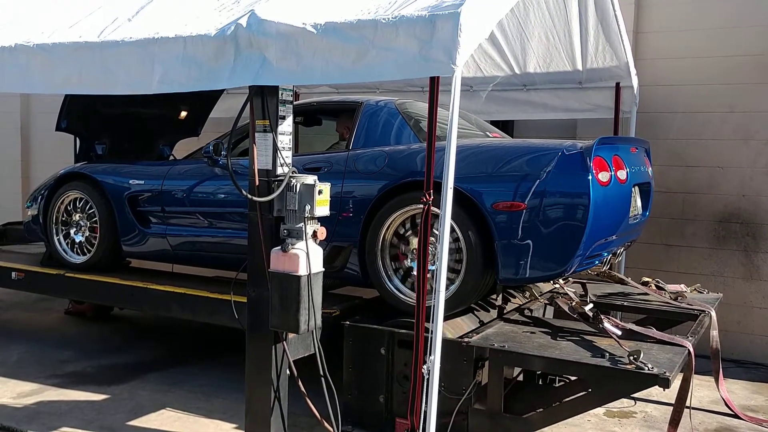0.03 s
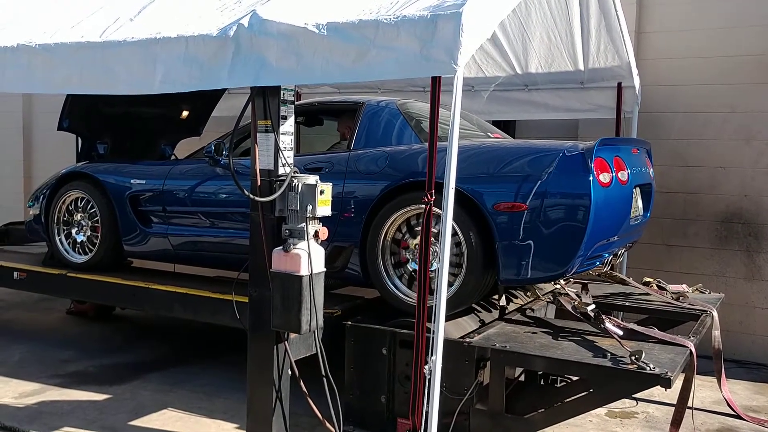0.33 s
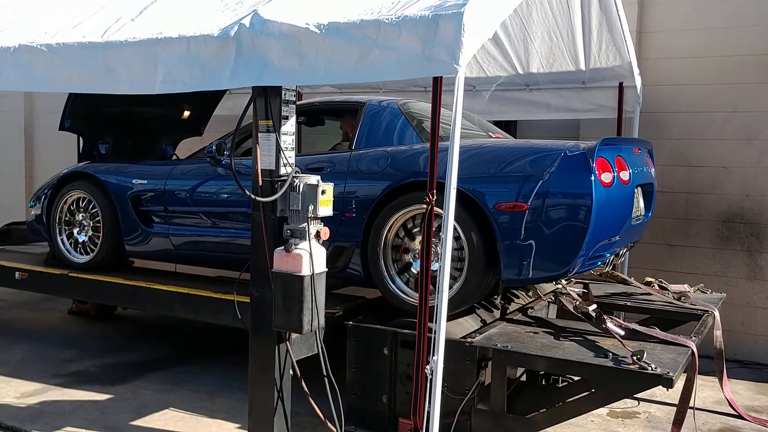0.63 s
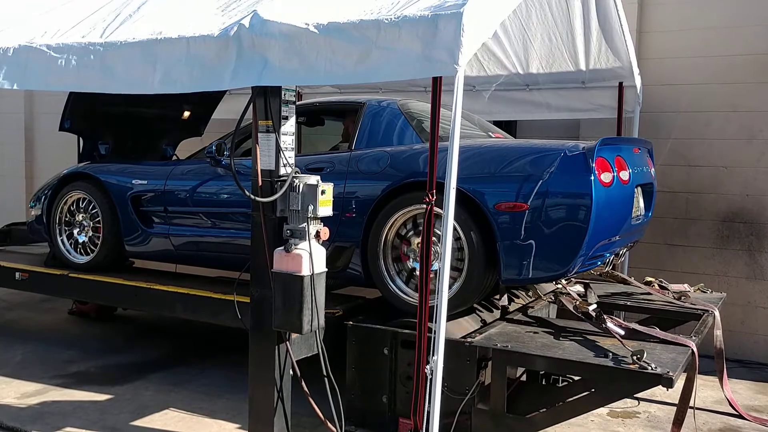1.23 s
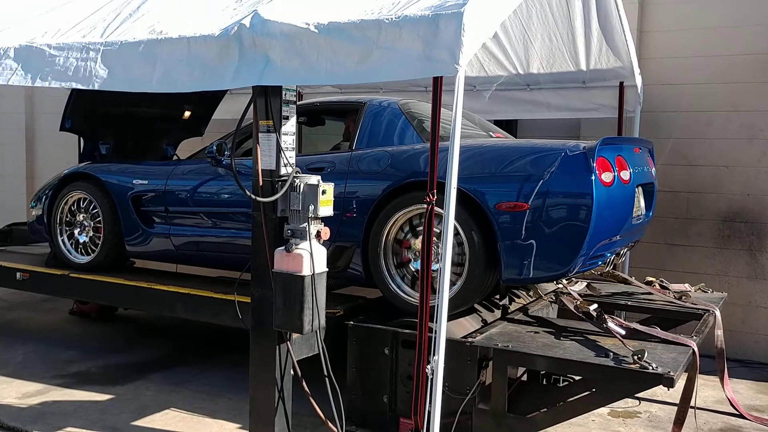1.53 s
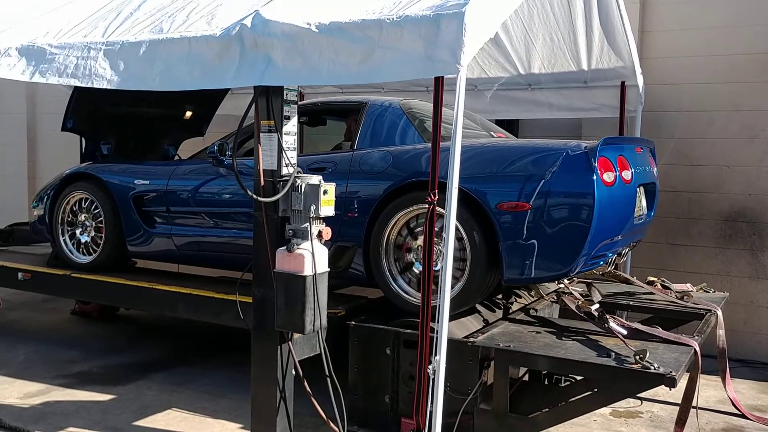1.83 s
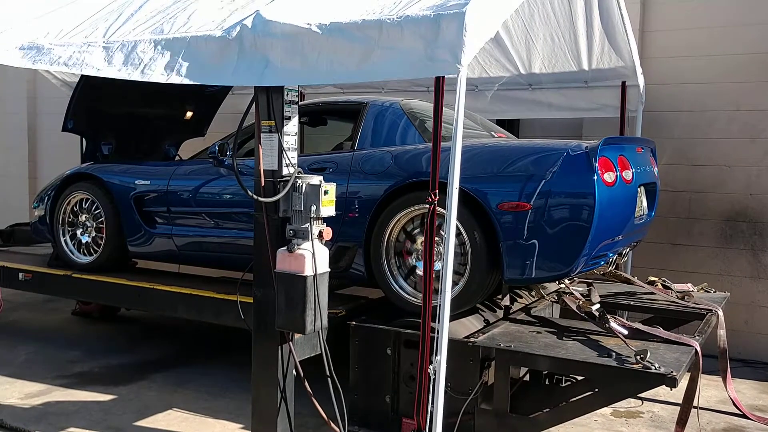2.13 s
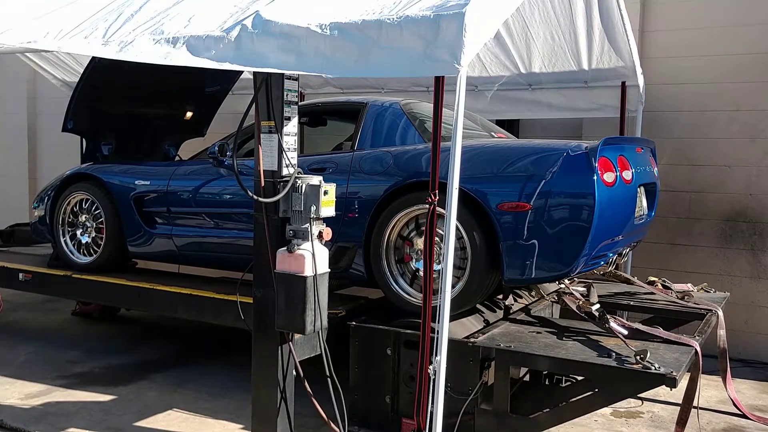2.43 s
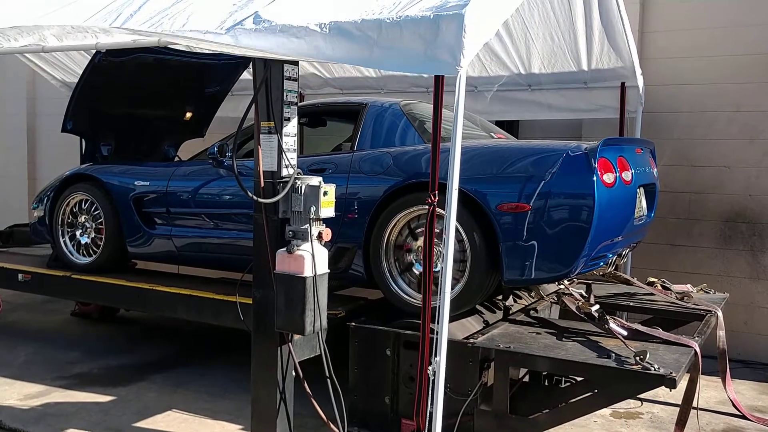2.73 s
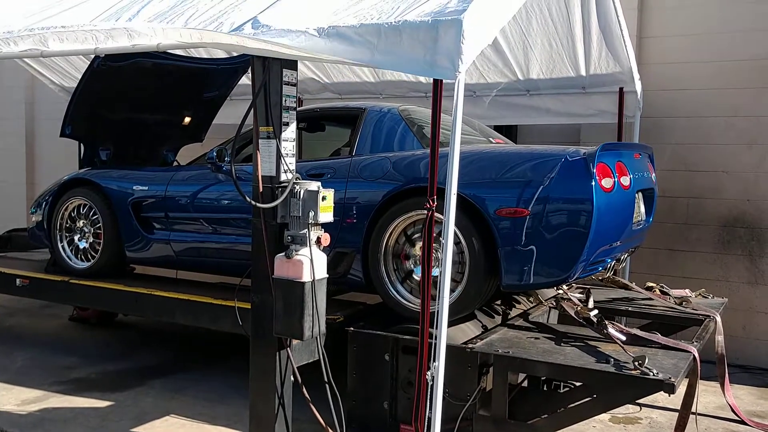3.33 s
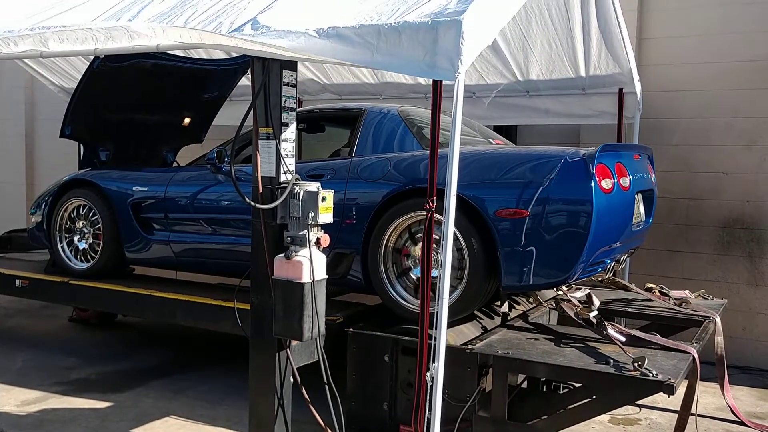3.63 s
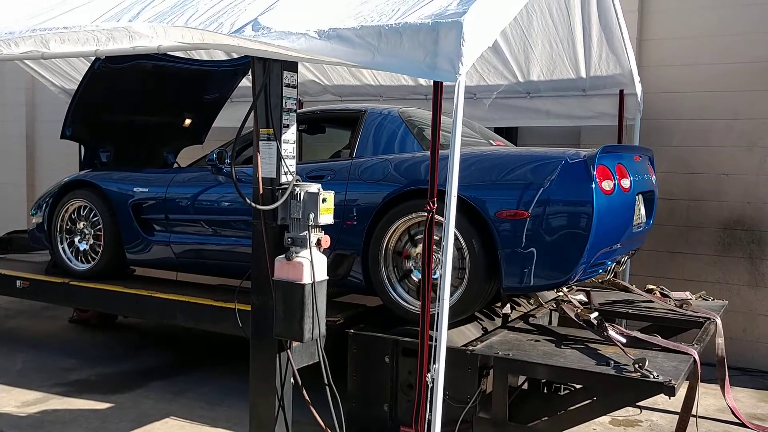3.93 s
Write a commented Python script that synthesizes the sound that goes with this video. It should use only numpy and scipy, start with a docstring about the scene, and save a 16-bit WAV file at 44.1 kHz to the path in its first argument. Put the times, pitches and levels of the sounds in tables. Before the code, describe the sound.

A sports car's V8 roars under load in a yard, starting with a thump and a fading suck of air, then revving smoothly higher. The exhaust is straight ahead, fan hiss slightly left, with short echoes off a nearby wall.

```python
"""A V8 barks as the throttle opens, then pulls steadily up through its revs: a sports car strapped to
a rolling road under an awning. The exhaust sits dead centre between the microphones, the orders of its
uneven beat sweeping through the fixed resonances of pipes and yard over a rasp of turbulent gas.
At the start the drive line thumps, and a suck and thin whistle fade as the throttle opens.
Fan and intake hiss off to the left; short echoes come back from the nearby wall and ramp."""
import sys
import numpy as np
from scipy import signal
from scipy.fft import rfft, irfft, next_fast_len
from scipy.io import wavfile

SR = 44100
rng = np.random.default_rng(int(sys.argv[2]) if len(sys.argv) > 2 else 0)


def transcribe(signal):
    """Save signal, clipped to [-1, 1], as a 16-bit WAV file at the path in sys.argv[1]."""
    frames = np.atleast_2d(signal).T
    limited = np.clip(frames, -1, 1)
    pcm = np.round(limited * 32767).astype(np.int16)
    wavfile.write(sys.argv[1], SR, pcm)


N = 176400
TIME = np.arange(N) / SR

# engine speed, eight firings a cycle (time [s], cycle rate [Hz])
ENGINE_SPEED = [(0, 21.77), (0.12, 21.85), (0.28, 22.78), (0.42, 22.86), (0.87, 24.56), (1.5, 26.94),
                (2.1, 29.24), (3, 32.81), (3.5, 34.84), (4, 36.89)]
# how hard the engine works (time [s], note level [dB], rasp level [dB], unevenness [0 = even])
ENGINE_EFFORT = [(0, -0.5, 7.5, 0.9), (.11, 0.5, 5.5, 1.2), (.18, 3.5, 12, 1.04), (.3, 4, 2, 1),
                 (.42, 1.5, 0.5, 0.8), (.66, 4.5, 7, 0.91), (.75, 1, 4.5, 0.83), (.9, 4.5, 4, 0.73),
                 (1.3, -1, 3.5, 0.27), (2, 0.36, 2, 0.01), (2.55, 1.5, 9.5, 0.28), (2.75, 2, 2, 0.19),
                 (3.1, 3.5, 9, 0.22), (3.7, 5, 8, 0.18), (4, 1.5, 8.5, 0.08)]
# cylinders in firing order (bank [0 or 1], place [count from the front])
FIRING_ORDER = [(0, 0), (1, 3), (0, 3), (1, 0), (1, 2), (0, 2), (1, 1), (0, 1)]
# harmonics of the exhaust beat (order [multiple of the cycle rate], level [dB])
EXHAUST_ORDERS = [(3, -3.9), (4, -14.9), (5, -3.1), (6, -11.1), (7, -9.5), (8, 4.4), (9, -19.6),
                  (10, -12.2), (11, -12.3), (12, -16.9), (13, -12.3), (14, -4.5), (15, -11.3), (16, 7.3),
                  (17, -8.7), (18, -1.4), (19, 2.8), (20, 0.9), (21, -1.9), (22, 9.7), (23, -5.7),
                  (24, 13.1), (25, -0.5), (26, 5.4), (27, 8.1), (28, 3.5), (29, 4.8), (30, 10.0),
                  (31, -0.6), (32, 13.9), (33, 4.9), (34, 9.0), (35, 9.5), (36, 7.2), (37, 2.0), (38, 9.9),
                  (39, 0.9), (40, 8.3)]
# orders that flare or sink, the opening bark first (time [s], order [multiple], half length [s], gain [dB])
ORDER_FLARES = [(.11, 38, .08, -15), (.12, 34, .09, -15), (.15, 8, .12, -8), (.2, 24, .11, 10),
                (.23, 32, .11, 9), (.36, 33, .22, 7.5), (.44, 17, .19, -13), (.6, 32, .14, -15),
                (.62, 37, .25, 10), (1.09, 26, .14, -16), (1.11, 28, .39, 9.2), (1.22, 27, .6, -16),
                (1.22, 30, .16, 9.7), (1.41, 20, .17, -15), (1.47, 19, .38, -14.7), (1.6, 8, .35, 3.5),
                (2.3, 8, .2, -9), (2.6, 24, .16, 3), (2.88, 32, .18, 3), (3.95, 16, .25, 4),
                (3.01, 22, .6, -10.6), (3.12, 23, .31, 11.2), (3.31, 31, .53, 9.6), (3.38, 18, .5, -16),
                (3.48, 27, .56, 5.8), (3.79, 20, .53, -16)]
# turbulence entering the pipes (frequency [Hz], level [dB])
RASP_COLOUR = [(40, 7), (100, 1.5), (400, 3), (750, 11.5), (1035, 16.5), (1300, 27.5), (1700, 25.5),
               (4000, 27)]
# resonances of pipes and yard (frequency [Hz], gain [dB])
PIPE_RESONANCES = [(30, -72), (68, -51), (90, -38), (105, -35), (150, -33), (215, -28), (250, -39),
                   (295, -39), (322, -30), (350, -34), (420, -26), (500, -29), (590, -24), (612, -26),
                   (655, -21), (700, -29), (745, -22), (800, -35), (850, -30), (885, -38), (925, -35),
                   (960, -40), (1035, -30), (1100, -44), (1155, -40.5), (1280, -45), (1500, -48),
                   (1650, -52), (1850, -60), (2200, -75), (2900, -66), (4400, -82), (9000, -110)]
# shudder of the drive line (frequency [Hz], level [dB])
THUMP_COLOUR = [(30, -55), (75, -11.5), (260, -13), (600, -43)]
# air drawn past the half-shut throttle (frequency [Hz], level [dB])
SUCK_COLOUR = [(600, -25), (1300, 16.5), (1900, 15), (2300, 3.5), (3000, 7), (5200, -32), (5900, 7),
               (6400, -2), (16000, -34)]
# swell of the fan and intake hiss (time [s], level [dB])
HISS_LEVEL = [(0.0, -31.5), (0.37, -33.5), (0.69, -29), (0.71, -32), (0.86, -27.5), (2.1, -31.5),
              (2.23, -29.5), (2.72, -33), (3.2, -28.5), (3.51, -30.5), (3.75, -27), (4.0, -31.5)]
# hiss common to both microphones (frequency [Hz], level [dB])
HISS_MID = [(200, -19), (1500, 15), (2200, -1.5), (2900, 3), (3600, -2), (4400, -9.5), (5200, 4.5),
            (5900, 8), (6800, -2), (7400, 3), (8400, -2), (10400, 3), (11800, -6), (13000, 0.5),
            (14100, -5), (15200, 2.5), (16000, -6)]
# hiss that differs between the microphones (frequency [Hz], level [dB])
HISS_SIDE = [(200, -0.5), (1500, 2), (2000, 10.5), (3200, -7), (4200, -0.5), (6200, 3), (9700, 1.5),
             (11800, -2.5), (14100, 0), (16000, -6.5)]
# the yard's echo at the microphones (frequency [Hz], echo over direct sound [dB])
YARD_ECHO = [(50, 7), (125, -7), (250, -10), (600, -12), (1000, -19), (1500, -9.5), (2000, 12), (3000, -10)]
# tilt of the microphone pair (frequency [Hz], left over right [dB])
MIC_BALANCE = [(100, 5.5), (500, -0.5), (2000, -0.5), (4000, -0.5), (8000, 1.3), (12000, -1.5)]


def exhaust(jitter_cycles=0.0008, puff_depth=0.18):
    """Centre, the main source: the firing beat and a puff of gas at each firing ring through the pipes."""
    cycle_hz, = curves(ENGINE_SPEED)
    note_db, rasp_db, uneven = curves(ENGINE_EFFORT)
    cycle_angle = 2 * np.pi * (np.cumsum(cycle_hz) / SR + jitter_cycles * uneven * wobble(40))
    beat = firing_beat(cycle_angle, uneven)
    rasp = noise(RASP_COLOUR) * (1 + puff_depth * np.cos(len(FIRING_ORDER) * cycle_angle))
    gas = amp(note_db) * beat + amp(rasp_db) * rasp
    return filtered(gas, lambda hz: ringing(PIPE_RESONANCES, hz))


def firing_beat(cycle_angle, uneven, bank_lag=0.15, runner_lead=0.06, drift_db=1.6, slip_rad=0.4):
    """Pulses of two cylinder banks, summed as orders that each swell, flutter and slip in phase."""
    bank, place = np.transpose(FIRING_ORDER)
    # in firing intervals, the far bank comes late and each place nearer the tail early
    arrival_cycles = (np.arange(len(bank)) + bank_lag * bank - runner_lead * place) / len(bank)
    high_orders_db = 7 + 2 * rng.standard_normal(20)
    levels_db = [db for _, db in EXHAUST_ORDERS] + list(high_orders_db)
    beat = np.zeros(N)
    for order, db in enumerate(levels_db, round(EXHAUST_ORDERS[0][0])):
        flare_db = sum(peak * bell(at, length) for at, k, length, peak in ORDER_FLARES if k == order)
        growl_db = 0.7 * uneven * (-7.4 - db)  # uneven firing pulls all orders towards one level
        strength = amp(db + growl_db + flare_db + drift_db * wobble(4))
        flutter = 1 + 0.2 * uneven * wobble(20)
        phase = np.angle(np.exp(-2j * np.pi * order * arrival_cycles).sum())
        beat += strength * flutter * np.cos(order * cycle_angle + phase + slip_rad * wobble(3))
    return beat


def driveline_thump(level_db=-22):
    """Under the car: a short dull shudder as the drive line takes up the load."""
    return amp(level_db) * unit(noise(THUMP_COLOUR)) * bell(at_s=0.033, half_length_s=0.025)


def throttle(open_s=0.28, fade_s=0.082, suck_db=-25, whistle_db=-24.5):
    """At the engine: air sucks and whistles past the throttle until it is wide open (mid, side)."""
    shut = (1 - np.tanh((TIME - open_s) / fade_s)) / 2
    pitch_hz = 1200 + 3 * wobble(43)
    whistle = unit(np.sin(2 * np.pi * np.cumsum(pitch_hz) / SR) * amp(2 * wobble(33.5)))
    suck = unit(np.array([noise(SUCK_COLOUR), noise(SUCK_COLOUR)])) * amp([[0], [-3]])
    return shut * (amp(suck_db) * suck + amp(whistle_db) * np.array([whistle, np.zeros(N)]))


def fan_and_intake(lead_s=0.00031, direct_share=0.86, gain_db=1.5, flicker_db=0.9):
    """At the front of the car: rushing air, whose hiss reaches the left microphone first (mid, side)."""
    level_db, = curves(HISS_LEVEL)
    direct, diffuse = rng.standard_normal((2, N))
    lead = lambda hz: direct_share * np.sin(2 * np.pi * hz * lead_s)
    side = filtered(direct, lambda hz: 1j * lead(hz))
    side += filtered(diffuse, lambda hz: np.sqrt(1 - lead(hz) ** 2))
    hiss = filtered(np.array([direct, side]), lambda hz: amp([along(HISS_MID, hz), along(HISS_SIDE, hz)]))
    return unit(hiss) * amp(gain_db + level_db + flicker_db * wobble(30.03))


def yard_echo(x, t60_s=0.16):
    """All around: echoes scattered by wall and ramp reach the two microphones differently (side)."""
    t = TIME[:SR // 4]
    tail = rng.standard_normal(len(t)) * amp(-60 * t / t60_s)
    scatter = lambda hz: np.exp(1j * np.angle(rfft(tail, 2 * (len(hz) - 1))))
    return filtered(x, lambda hz: scatter(hz) * amp(along(YARD_ECHO, hz)))


def amp(db):
    """Decibels to gain."""
    return 10 ** (np.asarray(db) / 20)


def unit(x):
    """Scaled to rms 1."""
    return x / np.sqrt(np.mean(x ** 2) + 1e-20)


def bell(at_s, half_length_s):
    """A smooth rise and fall of height 1."""
    return np.exp(-((TIME - at_s) / half_length_s) ** 2)


def along(points, hz):
    """(frequency [Hz], value) points joined on a log axis."""
    point_hz, values = np.transpose(points)
    return np.interp(np.log(hz + 1), np.log(point_hz + 1), values)


def curves(rows):
    """One value per sample for each column after the time."""
    times, *columns = np.transpose(rows)
    return [np.interp(TIME, times, column) for column in columns]


def wobble(per_s):
    """A smooth random curve of rms 1 with per_s knots a second."""
    smooth = signal.resample_poly(rng.standard_normal(400), 8, 1)
    return unit(np.interp(TIME * per_s, np.arange(len(smooth)) / 8, smooth))


def filtered(x, response):
    """x through a gain given as a function of frequency."""
    size = 2 * next_fast_len(N * 3 // 5)
    return irfft(rfft(x, size) * response(np.fft.rfftfreq(size, 1 / SR)), size)[..., :N]


def ringing(points, hz):
    """The causal response through these (frequency [Hz], gain [dB]) points."""
    cepstrum = irfft(np.log(amp(along(points, hz))))
    half = len(cepstrum) // 2
    causal = np.r_[1, np.full(half - 1, 2), np.zeros(half)]
    return np.exp(rfft(cepstrum * causal))


def noise(colour):
    """Noise shaped by (frequency [Hz], level [dB]) points."""
    return filtered(rng.standard_normal(N), lambda hz: amp(along(colour, hz)))


def scene():
    """From the microphone position: exhaust in the middle, air and echoes around it (left, right)."""
    roar = exhaust() + driveline_thump()
    mid, side = np.array([roar, yard_echo(roar)]) + fan_and_intake() + throttle()
    return np.array([mid + side, mid - side])


def record(dry, top_hz=15800):
    """A slightly unmatched microphone pair; peaks are rounded off and the top band is cut."""
    tilted = filtered(dry, lambda hz: amp(along(MIC_BALANCE, hz) * np.array([[0.5], [-0.5]])))
    rounded = tilted / (1 + np.abs(tilted) ** 8) ** (1 / 8)
    return filtered(rounded, lambda hz: hz < top_hz)


dry = scene()
out = record(dry)
transcribe(out)
```